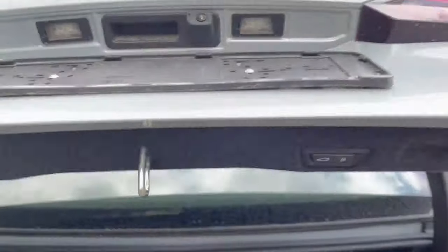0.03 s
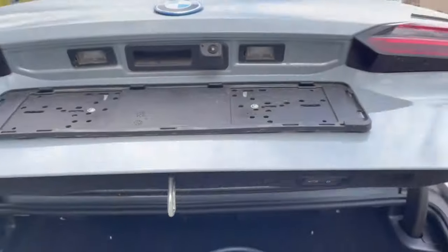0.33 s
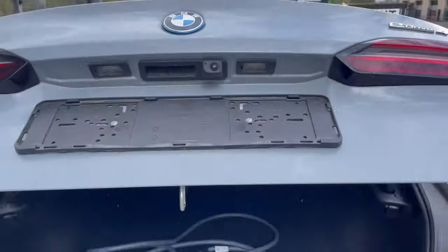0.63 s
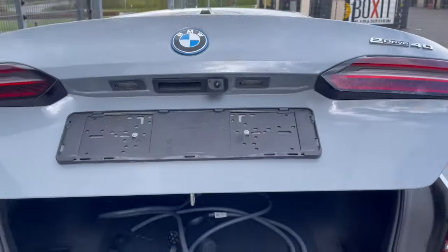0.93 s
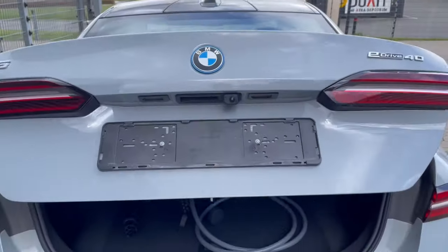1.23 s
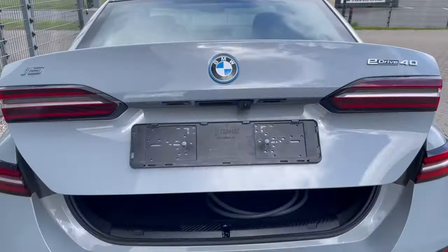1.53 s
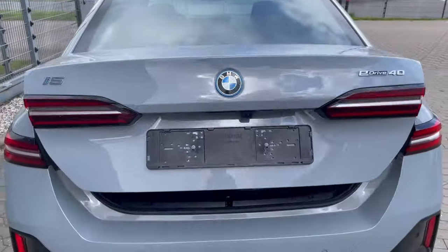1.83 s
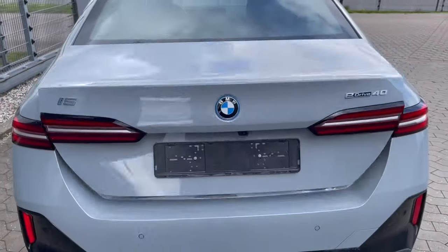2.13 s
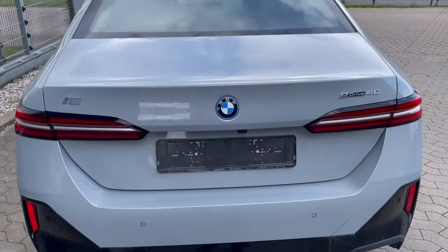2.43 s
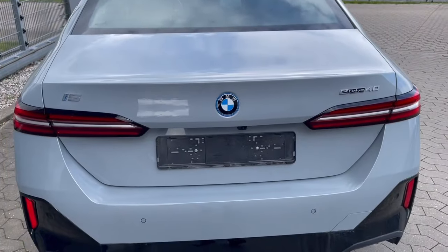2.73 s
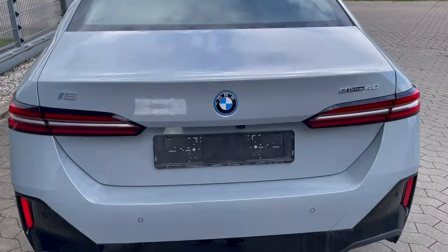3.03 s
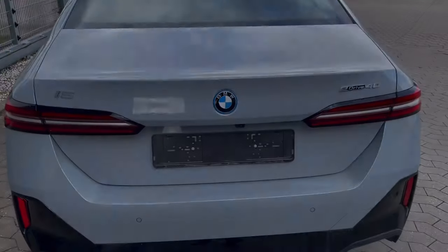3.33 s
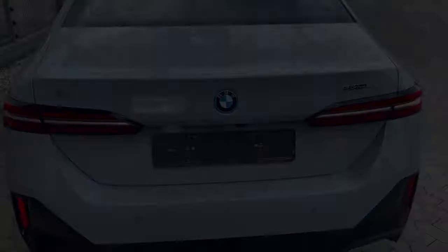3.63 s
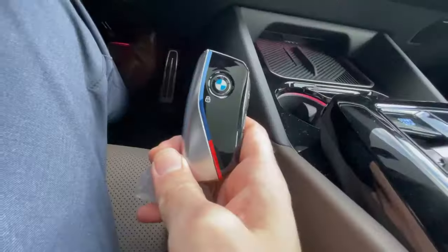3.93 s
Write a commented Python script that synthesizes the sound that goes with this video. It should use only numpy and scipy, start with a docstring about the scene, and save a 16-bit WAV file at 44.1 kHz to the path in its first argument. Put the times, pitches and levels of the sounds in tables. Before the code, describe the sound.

A car boot lid thuds shut after a soft, hissing descent, its metal booming briefly. A sharp lock clack follows, with a faint motor whine and light ticks, while wind buffets the microphone and traffic hums far away.

```python
"""Wind buffets the microphone as a powered car boot lid lowers, its drives hissing over distant traffic.
The lid lands with a thud: its sheet metal booms, the latch snaps over, trapped air gives a low push.
The lock motor whines faintly, the bolt clacks home, and the motor whines again between two ticks.
Just before the end, everything drops away at once."""
import sys
import numpy as np
from scipy import signal
from scipy.fft import rfft, irfft
from scipy.io import wavfile

SR = 44100
rng = np.random.default_rng(int(sys.argv[2]) if len(sys.argv) > 2 else 0)


def inscribe(sig):
    """Save sig as 16-bit PCM at rate SR to the path in sys.argv[1].

    A 1-D sig is mono; a 2-D sig holds one channel per row.
    Samples are clipped to [-1, 1] before scaling.
    """
    pcm = np.round(np.clip(np.atleast_2d(sig).T, -1, 1) * 32767)
    wavfile.write(sys.argv[1], SR, pcm.astype(np.int16))


N = 176400
TIME = np.arange(N) / SR

# blows as the lid touches, seats, is caught and is locked: t/s, boom level/dB, rattle level/dB
LID_BLOWS = [(2.2343, 0, 0), (2.2424, 0, -12), (2.2673, -7.5, -7), (3.0598, -23, -18)]
# low modes of its sheet metal: f/Hz, level/dB, t60/s
BOOM_MODES = [(90, -44, .3), (158, -44, .18), (202, -38, .11), (276, -45, .2), (320, -29.3, .125),
              (360, -42, .17), (387, -45, .18), (425, -36.5, .15), (463, -44.5, .19), (521, -40, .12),
              (664, -45, .17), (752, -48, .1), (868, -48, .09)]
# its dense higher modes: f/Hz, level/dB
RATTLE_EQ = [(400, -3.5), (850, -2), (1200, -14.5), (2400, -15.5), (3000, -33.5), (4800, -34), (7000, -43),
             (15000, -57)]
# snaps of the catch and of the lock bolt: t/s, level/dB, brightness/(dB per octave)
CATCH_HITS = [(2.2597, -6, 1.9), (2.2643, -0.5, -1.5)]
BOLT_HITS = [(3.0588, -6, 7.5), (3.0606, 6, -1.4), (3.1075, -17, -3), (3.1275, -30, -1)]
# the steel modes of each: f/Hz, level/dB, t60/s
CATCH_RING = [(1145, -60, .07), (1455, -51, .065), (1745, -39, .055), (1820, -45.5, .04), (2195, -52, .06),
              (2900, -60, .09), (3456, -65, .1), (5480, -57, .06), (6620, -59, .08), (7850, -63, .08),
              (9490, -56, .045), (11460, -54, .07)]
BOLT_RING = [(323, -56, .16), (732, -48, .12), (900, -50, .07), (1757, -47, .07), (2015, -52, .07),
             (2415, -47, .06), (2530, -53, .05), (4285, -62, .07), (4560, -62, .05), (5560, -55, .055),
             (6110, -57, .05), (6680, -65, .07), (10950, -57, .05), (11225, -55, .055), (11920, -54, .05),
             (12820, -60, .05)]
# the crack of each: f/Hz, level/dB
CATCH_EQ = [(400, 12.5), (900, -6), (1250, 2), (2300, -1), (3100, -10.5), (4700, -14), (6000, -11),
            (8500, -16), (10200, -9.5), (11600, -8), (12400, -19), (15500, -21)]
BOLT_EQ = [(280, 8), (500, 15.5), (850, -4.5), (1300, 0), (2400, -0.5), (3000, -8.5), (4400, -3),
           (5000, -10.5), (6500, -2.5), (8300, -16), (10000, -6), (12500, -12), (14000, -19), (15500, -17)]
# light ticks of the mechanism: t/s, level/dB, low-pass f/Hz, t60/s
TICK_HITS = [(1.8113, -65.5, 2600, .018), (2.5451, -72, 8000, .012), (3.3034, -65.5, 6000, .04),
             (3.8646, -58, 2100, .045)]
# their tone: f/Hz, level/dB
TICK_EQ = [(1400, -10), (1800, 0), (2200, -8), (2700, -4), (3700, -9), (7000, -7), (12000, -12)]
# runs of the lock motor: start t/s, end t/s, f/Hz, level/dB
MOTOR_RUNS = [(2.446, 2.793, 1765, -85.5), (3.28, 3.893, 1777, -80)]
# fader on the drives' hiss: t/s, level/dB
HISS_FADER = [(0, -77.5), (0.2, -81.5), (0.38, -84.5), (0.45, -77.5), (0.53, -90), (0.7, -86.5),
              (0.86, -83), (1.08, -85), (1.36, -82.5), (1.55, -86.5), (2.0, -84.5), (2.22, -83.5),
              (2.35, -84), (2.6, -88.5), (3.2, -92)]
# its tone: f/Hz, level/dB
HISS_EQ = [(1500, -6.5), (2800, 3.5), (4700, 1.5), (7000, 0.5), (11500, -0.5), (15500, -7.5)]
# rubbing tones of the moving lid: start t/s, end t/s, f/Hz, glide/(Hz per s), width/Hz, level/dB
RUB_TONES = [(-0.06, 0.1, 5500, 0, 25, -85), (0.02, 0.35, 4600, 0, 300, -94),
             (0.58, 1.08, 4700, -400, 330, -87), (0.6, 1.04, 14700, -5000, 500, -90.5),
             (1.1, 1.45, 4400, 0, 500, -92)]
# scuffs as the lid lowers: t/s, half length/s, level/dB
SCUFF_SWELLS = [(0.46, .035, -86), (0.85, 0.051, -83.5), (0.995, 0.017, -80), (1.312, 0.016, -80.5),
                (1.371, 0.0084, -79)]
# their tone: f/Hz, level/dB
SCUFF_EQ = [(1800, -8), (3000, 1), (5500, 0), (8000, -6), (11000, 0), (13000, -12)]
# fader on the wind's rumble, and its brief buffets: t/s, level/dB
GUST_FADER = [(0.02, -30), (0.21, -32), (0.55, -34), (0.8, -32), (1.05, -33.5), (1.42, -39), (1.87, -30.5),
              (2.0, -36), (2.29, -33), (2.38, -29), (2.62, -28), (2.81, -35), (3.02, -35.5), (3.07, -35),
              (3.58, -37), (3.88, -36.5)]
BUFFET_PEAKS = [(0.016, -40), (0.86, -68), (1.219, -52.5), (1.86, -54.5), (3.56, -52.5)]
# the tone of each: f/Hz, level/dB
RUMBLE_EQ = [(1.5, 5), (4, 9), (11, 2), (21, -8.5), (32, -11.5), (45, -16.5), (60, -22), (88, -28),
             (118, -38.5), (160, -48), (220, -54)]
BUFFET_EQ = [(50, 0.5), (90, -3), (140, -6.5), (250, -31)]
# distant traffic and open air: f/Hz, level/dB
TRAFFIC_EQ = [(110, -5.5), (170, 2.5), (240, 0.5), (310, 0), (450, -2), (800, -1), (1000, -9), (1200, -15),
              (1550, -17.5), (2200, -26), (3200, -36.5), (6000, -41.5), (15500, -46)]


def lid_thud(boom_trim_db=0.5, rattle_trim_db=-42.5, seal_s=0.0003):
    """Sheet metal booms in its low modes, cushioned by the rubber seal, with a short rattle on top."""
    metal, out = noise(RATTLE_EQ), 0
    for start, boom_db, rattle_db in LID_BLOWS:
        boom = sum((-1) ** k * ring([start], [boom_trim_db + boom_db + db], hz, t60)
                   for k, (hz, db, t60) in enumerate(BOOM_MODES))
        cushion = 1 - np.exp(-np.maximum(TIME - start, 0) / seal_s)
        rattle = metal * from_db(rattle_trim_db + rattle_db) * decay(start, t60=0.095)
        out += boom * cushion + rattle
    return out


def latch(hits, modes, crack_eq, ring_db):
    """Steel snaps over: a few ringing modes, a sharp crack and a fainter tail."""
    starts, hit_db, tilts = np.transpose(hits)
    pivot_hz, out = 3000, 0  # each hit's brightness tilts around this pivot
    for k, (hz, db, t60) in enumerate(modes):
        levels = hit_db + ring_db + db + tilts * np.log2(hz / pivot_hz)
        out += (-1) ** k * ring(starts, levels, hz, t60)
    for start, level, tilt in hits:
        tilted_eq = [(hz, db + tilt * np.log2(hz / pivot_hz)) for hz, db in crack_eq]
        crack = from_db(level - 47.5) * decay(start, t60=0.041)
        tail = from_db(level - 57.5) * decay(start, t60=0.12)  # housing and lid ring on
        out += noise(tilted_eq) * (crack + tail)
    return out


def air_push():
    """Air trapped under the lid gives one sub-bass shove."""
    return -ring(starts=[2.259], levels_db=[-17], hz=17, t60=0.12)


def ticks():
    """Small contacts inside the lid, muffled by its trim."""
    grain, out = noise(TICK_EQ), 0
    for start, db, cutoff_hz, t60 in TICK_HITS:
        muffled = signal.sosfilt(signal.butter(3, cutoff_hz, fs=SR, output="sos"), grain)
        out += from_db(db) * decay(start, t60) * rms_one(muffled)
    return out


def lock_motor():
    """The small motor runs with a thin, slightly wavering whine."""
    waver_hz = 5.5 * drift(15)
    return sum(from_db(db) * gate(start, end, ramp_s=0.025) * sine(hz + waver_hz)
               for start, end, hz, db in MOTOR_RUNS)


def lid_drives(grains_per_s=1300):
    """The drives hiss while the lowering lid rubs in wavering tones and scuffs a few times."""
    hiss = from_db(in_time(HISS_FADER)) * noise(HISS_EQ, flicker_db=1.1)
    rubs = 0
    for start, end, hz, glide, width_hz, db in RUB_TONES:
        pitch = hz + glide * (TIME - start) + 0.7 * width_hz * drift(25)
        narrow_band = rms_one(drift(width_hz) * sine(pitch))
        arch = np.sqrt(gate(start, end, ramp_s=(end - start) / 2))
        rubs += from_db(db) * arch * narrow_band
    grains = (rng.random(N) < grains_per_s / SR) * rng.standard_normal(N)
    scuff_level = sum(from_db(db) * swell(t, half_s) for t, half_s, db in SCUFF_SWELLS)
    return hiss + rubs + equalise(grains, SCUFF_EQ) * scuff_level


def wind(rumble_trim_db=6.5, fade_in_s=0.0053):
    """Gusts rumble on the microphone, with buffets that reach a little higher."""
    gust_level = from_db(rumble_trim_db + in_time(GUST_FADER))
    rumble = gust_level * noise(RUMBLE_EQ, flicker_db=1.6, flicker_hz=5)
    buffets = noise(BUFFET_EQ) * sum(from_db(db) * swell(t, half_s=0.021) for t, db in BUFFET_PEAKS)
    return (rumble + buffets) * np.minimum(TIME / fade_in_s, 1)


def traffic():
    """Distant traffic lays down a dull, nearly steady bed."""
    return from_db(-59.5) * noise(TRAFFIC_EQ, flicker_db=0.68)


def from_db(db):
    """Decibels to gain."""
    return 10 ** (np.asarray(db) / 20)


def rms_one(x):
    """Scale to rms 1."""
    return x / np.sqrt(np.mean(x ** 2) + 1e-20)


def in_time(rows):
    """A fader curve at every sample."""
    return np.interp(TIME, *np.transpose(rows))


def sine(hz):
    """An oscillator that follows a pitch curve."""
    return np.sin(2 * np.pi * np.cumsum(hz) / SR)


def drift(rate_hz):
    """A smooth random wobble with spread 1."""
    hop, run_in = 40, 2000
    pole = np.exp(-2 * np.pi * hop * rate_hz / SR)
    white = rng.standard_normal(N // hop + run_in + 2)
    slow = signal.lfilter([1], [1, -2 * pole, pole * pole], white)[run_in:]
    return np.interp(np.arange(N) / hop, np.arange(len(slow)), rms_one(slow))


def equalise(x, eq):
    """Apply an EQ curve, falling 24 dB per octave beyond its ends; rms 1."""
    hz, db = np.transpose(eq)
    octave, knots = np.log2(np.arange(N // 2 + 1) * SR / N + 1e-3), np.log2(hz)
    outside = np.abs(octave - np.clip(octave, knots[0], knots[-1]))
    gain = from_db(np.interp(octave, knots, db) - 24 * outside)
    return rms_one(irfft(rfft(x) * gain, N))


def noise(eq, flicker_db=0, flicker_hz=14):
    """Coloured noise with an optional level flicker; rms 1."""
    return rms_one(equalise(rng.standard_normal(N), eq) * from_db(flicker_db * drift(flicker_hz)))


def ring(starts, levels_db, hz, t60):
    """One mode, struck at the given times and levels."""
    out, age = np.zeros(N + SR), TIME[:SR]
    tone = np.sin(2 * np.pi * hz * age) * from_db(-60 * age / t60)
    for start, db in zip(starts, levels_db):
        i = int(start * SR)
        out[i:i + SR] += from_db(db) * tone
    return out[:N]


def decay(start, t60):
    """A hard attack that dies away."""
    age = TIME - start
    return np.clip(age * 3000, 0, 1) * from_db(-60 * np.clip(age / t60, 0, 4))


def swell(centre, half_s):
    """A bell-shaped rise and fall."""
    return np.exp(-0.5 * np.minimum(((TIME - centre) / half_s) ** 2, 100))


def gate(start, end, ramp_s):
    """Fade in, hold, fade out."""
    return np.clip(np.minimum(TIME - start, end - TIME) / ramp_s, 0, 1)


def end_drop(db, start_s=3.9, fall_s=0.00006):
    """The level drops abruptly near the end."""
    return from_db(db * np.clip((TIME - start_s) / fall_s, 0, 1))


def scene():
    """The lid and its lock over traffic and wind, in mono."""
    bed = traffic()
    catch = latch(CATCH_HITS, CATCH_RING, CATCH_EQ, ring_db=-10.5)
    bolt = latch(BOLT_HITS, BOLT_RING, BOLT_EQ, ring_db=-9)
    car = lid_drives() + lid_thud() + catch + air_push() + bolt + ticks() + lock_motor()
    return np.array([(car + bed) * end_drop(db=-20) + wind() * end_drop(db=-11)])


def record(dry):
    """A steep high cut at 15.8 kHz."""
    return signal.sosfilt(signal.ellip(10, 0.1, 80, 15800, fs=SR, output="sos"), dry)


dry = scene()
out = record(dry)
inscribe(out)
```